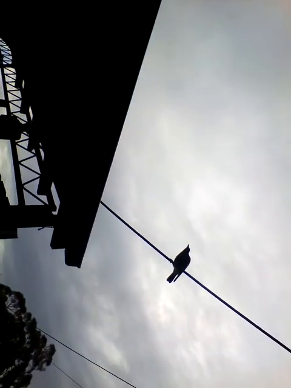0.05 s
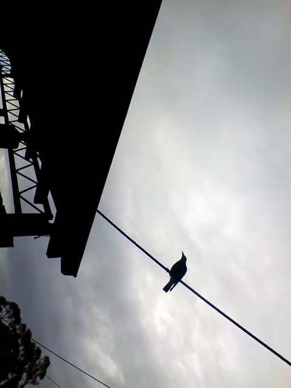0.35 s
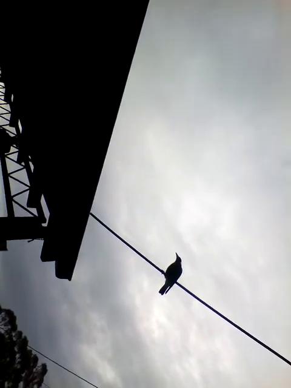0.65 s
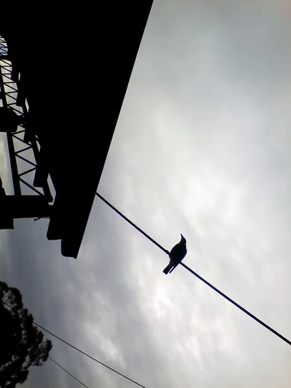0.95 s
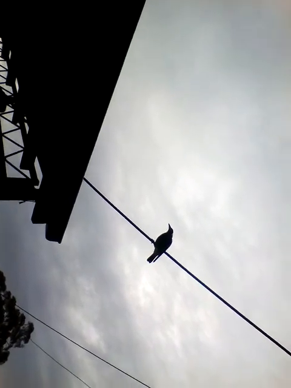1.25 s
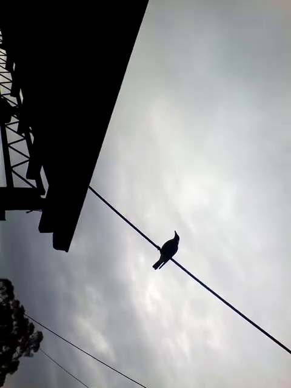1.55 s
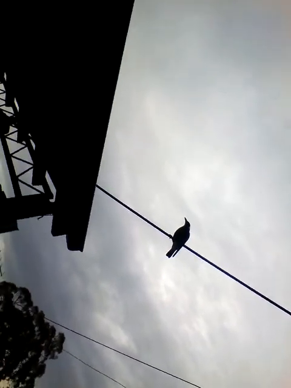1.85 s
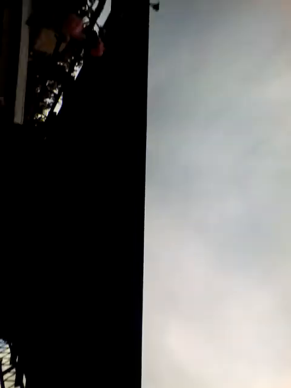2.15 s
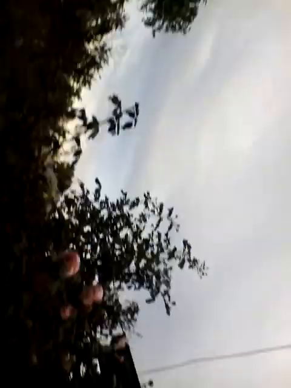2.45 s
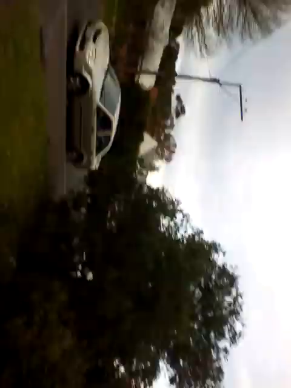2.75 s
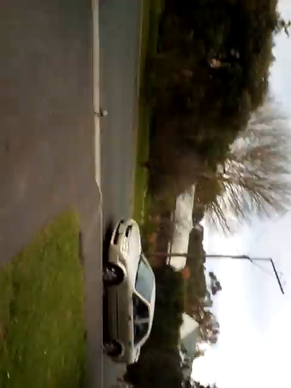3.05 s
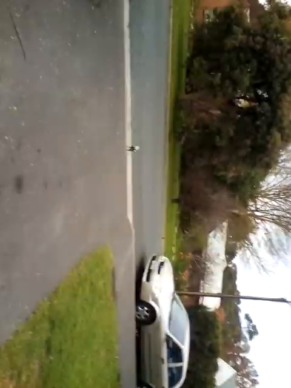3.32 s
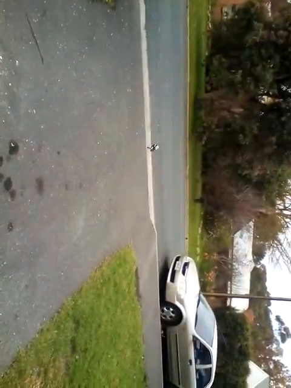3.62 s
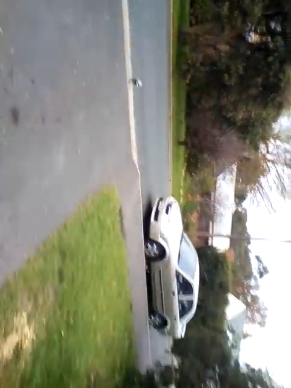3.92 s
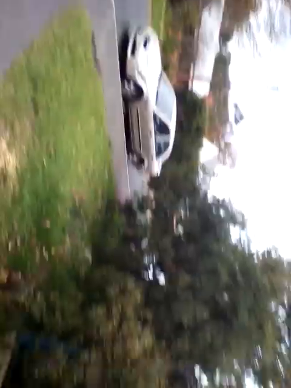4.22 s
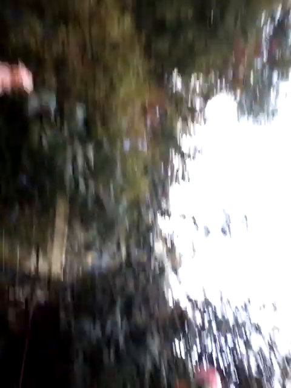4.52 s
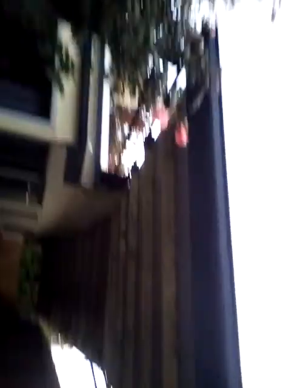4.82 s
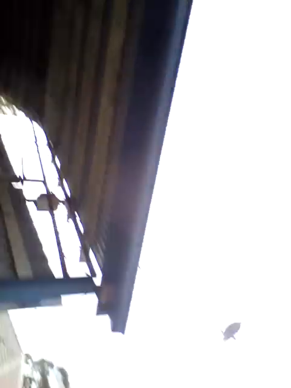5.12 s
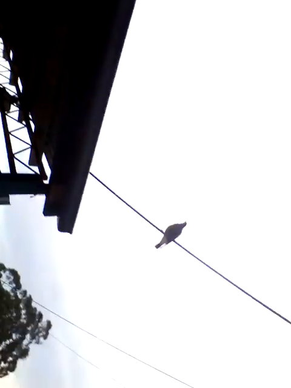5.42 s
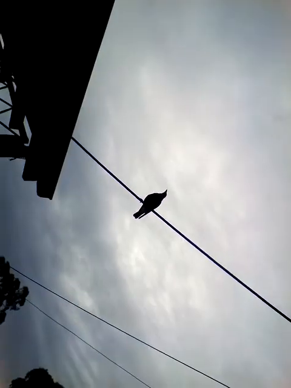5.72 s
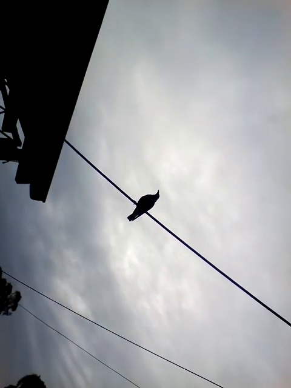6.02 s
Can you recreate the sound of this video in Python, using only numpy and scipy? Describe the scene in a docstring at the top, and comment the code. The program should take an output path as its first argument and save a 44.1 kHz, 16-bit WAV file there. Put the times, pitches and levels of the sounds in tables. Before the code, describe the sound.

A quiet outdoor street hums faintly throughout, with a soft scuff close by at about 0.3 seconds. From 0.6 seconds young magpies warble nearby, a continuous run of short fluted notes that glide up and down, mixed with quick flicks, trills and breathy rasps. A small bird farther off gives thin, high falling chirps near 0.8, 1.8, 2.5 and 3.4 seconds, and distant birds pipe very faintly. Two loud crackling squawks come at about 4 and 4.4 seconds, with soft rustling between them. Fuller, louder notes follow until about 5 seconds, then lighter warbling continues to the end at around 6.3 seconds, joined by thin twitters from the small bird. Light puffs of wind touch the microphone near 2.7 and 4.5 seconds, and a few more faint scuffs occur along the way. The magpies' notes carry short, slight echoes off the houses.

```python
"""A quiet street hums under puffs of wind; distant birds pipe, and something scuffs close by.
Then young magpies warble on a wire: fluted notes, quick flicks, trills, rasps and two crackling
squawks from both sides of the syrinx, a bird's voice box. Their notes glide, swell and sink; the wider
the beak, the brighter the overtones. A small bird farther off throws in thin falling chirps,
and the houses give short echoes."""
import sys
import numpy as np
from scipy import signal
from scipy.fft import rfft, irfft, next_fast_len
from scipy.io import wavfile
from scipy.ndimage import uniform_filter1d

SR = 44100
rng = np.random.default_rng(int(sys.argv[2]) if len(sys.argv) > 2 else 0)


def persist_wave(psi):
    """Save psi, clipped to +-1, as 16-bit WAV."""
    counts = np.round(np.clip(psi, -1, 1) * 32767).astype(np.int16)
    wavfile.write(sys.argv[1], SR, np.atleast_2d(counts).T)


N = 276362
TIME = np.arange(N) / SR


def from_db(db):
    """Turn decibels into a number to multiply by."""
    return 10 ** (np.asarray(db) / 20)


def rms_one(x):
    """Scale a signal to an average power of 1."""
    return x / np.sqrt(np.mean(x ** 2) + 1e-20)


def at_hz(points, hz):
    """Read the level between a table's frequencies, with octaves evenly spaced."""
    points = np.array(points)
    return np.interp(np.log(hz), np.log(points[:, 0]), points[:, 1])


def wobble(rate_hz, size):
    """Wander at random between -2 and 2, up to a given rate."""
    knots = np.tanh(rng.standard_normal(int(size * 2 * rate_hz / SR) + 3))
    return np.interp(np.arange(size) * 2 * rate_hz / SR, np.arange(len(knots)), knots) * 2


def fade(t, start, end, edge_s):
    """Fade in around start and out around end."""
    return np.sin(np.pi / 2 * np.clip(np.minimum(t - start, end - t) / edge_s + .5, 0, 1)) ** 2


def coloured_noise(colour):
    """Noise of power 1; its colour table says how strong the lows and highs are."""
    size = next_fast_len(N)
    hz = np.arange(size // 2 + 1) * SR / size
    spectrum = rfft(rng.standard_normal(size)) * from_db(at_hz(colour, hz + 1))
    return rms_one(irfft(spectrum, size)[:N])


def whistles(table, quaver, quaver_hz, bend=2.1):
    """Thin, quavering tones that hold their pitch at first and then glide ever faster."""
    out = np.zeros(N)
    for start, length, first_hz, last_hz, level_db in table:
        at, size = int(start * SR), int(length * SR)
        glide_hz = first_hz * (last_hz / first_hz) ** np.linspace(0, 1, size) ** bend
        hz = glide_hz * (1 + quaver * wobble(quaver_hz, size))
        note = from_db(level_db) * signal.windows.tukey(size, .5) * np.sin(2 * np.pi * np.cumsum(hz) / SR)
        out[at:at + size] += note[:N - at]
    return out


# The tones of the low hum: pitch_hz, level_db
HUM_TONES = [(120, -69.5), (153, -73.5)]
# How hard wind and handling buffet the microphone: time_s, level_db
WIND_LEVELS = [(0, -64.5), (1.9, -67.5), (2.42, -61), (2.55, -68), (2.68, -51), (2.85, -61), (3.0, -63),
               (3.8, -71), (4.3, -57), (4.55, -54.5), (4.8, -66.5), (5.8, -69.5), (6.27, -57)]
# The colour of that rumble: frequency_hz, level_db
RUMBLE_COLOUR = [(10, -27), (45, -7), (75, 3.5), (130, -1), (250, -24), (600, -25.5), (2000, -63.5)]
# The colour of the distant street: frequency_hz, level_db
STREET_COLOUR = [(25, -26.5), (120, -2.5), (250, -5.5), (450, -14.5), (800, -12.5), (1400, -19.5),
                 (2500, -28.5), (4200, -27), (6500, -30), (9000, -47.5)]


def street_and_wind(street_db=-64, hum_waver=0.0059, puff_db=3):
    """A wavering hum, puffs of wind on the microphone and steady street noise."""
    hum = np.zeros(N)
    for pitch_hz, level_db in HUM_TONES:
        hz = pitch_hz * (1 + hum_waver * wobble(7.3, N))
        hum += from_db(level_db) * np.sqrt(2) * np.sin(2 * np.pi * np.cumsum(hz) / SR)
    wind_db = np.interp(TIME, *np.transpose(WIND_LEVELS)) + puff_db * wobble(9, N)
    wind = from_db(wind_db) * coloured_noise(RUMBLE_COLOUR)
    return hum + wind + from_db(street_db) * coloured_noise(STREET_COLOUR)


# Distant piping notes: start_s, length_s, first_hz, last_hz, relative_level_db
PIPING_NOTES = [(.25, 0.93, 3114, 3160, -78.5), (2.54, 0.4, 3147, 3160, -76),
                (4.65, 0.063, 3170, 3360, -67.5), (5.06, 0.12, 3880, 3900, -70.5)]


def distant_birds():
    """Faraway birds pipe faint, almost level notes."""
    return whistles(PIPING_NOTES, quaver=0.011, quaver_hz=59.193)


# Scuffs and rustles close by: start_s, decay_s (time to fall 60 dB), scratch_db, thud_db, fizz_db
SCUFF_EVENTS = [(0.301, 0.5, -49.5, -67, -73), (0.422, 0.8, -56, -79.5, -73), (0.707, 2, -57.5, -60, -65),
                (1.413, 2, -60.5, -54.5, -68.5), (1.56, 7, -74.5, -77.5, -72.5), (2.82, 2, -78, -55.5, -78),
                (4.116, 0.5, -58.5, -52, -55), (4.206, 1, -55.5, -51.5, -55),
                (5.412, 1.5, -58.5, -56.5, -67)]
# The colours of their three parts: frequency_hz, level_db
SCRATCH = [(100, -31.5), (500, 2), (800, 11), (1300, 6), (2000, 5), (2700, -21), (4300, -29), (8000, -53)]
THUD = [(100, -9.5), (400, -6), (700, -4), (1100, -12), (2200, -44)]
FIZZ = [(900, -23), (2500, 5), (4400, -1), (6200, -6), (8000, -37)]


def scuffs(grain_db=2, attack_s=0.0081):
    """Grainy bursts that die away, each part scratch, part dull thud and part fizz."""
    noises = np.array([coloured_noise(colour) for colour in (SCRATCH, THUD, FIZZ)])
    out = np.zeros(N)
    for start, decay_s, *levels_db in SCUFF_EVENTS:
        age = np.maximum(TIME - start, 0)
        loudness = from_db(-60 * age / decay_s) * np.minimum(age / attack_s, 1)
        out += loudness * (from_db(levels_db) @ noises)
    return out * rms_one(from_db(grain_db * wobble(110, N)))


CALM_RASP, EDGE_RASP = 0.0396, .15  # roughness, 0-1: of a clear note; the least at a note's ends
WAVER_SHARE, WAVER_DB, WAVER_HZ = 0.0043, 1.44, 47.05  # a held note is never quite steady
EDGE_S = 0.0085  # the quickest fade in or out
# How throat and beak favour some overtones (multiples of the pitch): frequency_hz, gain_db
THROAT_COLOUR = [(1400, 14), (2050, 3.5), (2400, -2.5), (2800, 4), (3400, 2.5), (4100, 13.5), (4900, 1.5),
                 (5500, -0.5), (6300, 0.5), (7200, -22.5), (11000, -26.5)]


def magpie_note(start, length, first_hz, last_hz, arch, peak_db, peak_at, overtones_db,
                flutter_hz=90, depth=0, rasp=CALM_RASP,
                rise_db=7.5, sink_db=4, flutter_swing=0.17, jitter=0.1213, shimmer_db=5, even_db=-3):
    """One membrane of the syrinx sings a nearly pure tone; flutter and rasp shake its pitch and level.
    Returns the note's place in time, its tone, and the strength of rushing air in throat and beak."""
    edge_s = EDGE_S + .025 * rasp + .04 * length  # rough or long notes fade more gently
    span = slice(int((start - edge_s) * SR), min(N, int((start + length + edge_s) * SR)))
    t = TIME[span]
    along = np.clip((t - start) / length, 0, 1)
    from_middle = 2 * along - 1

    rate_hz = flutter_hz * (1 + 0.035 * wobble(79, len(t)))
    flutter = -min(depth, 1) * np.cos(2 * np.pi * (np.cumsum(rate_hz) / SR - flutter_hz * edge_s))
    hz = first_hz * (last_hz / first_hz) ** along * (1 + arch * (1 - from_middle ** 2))
    rough = np.maximum(rasp, EDGE_RASP * from_middle ** 4)
    unrest = flutter_swing * flutter + jitter * rough * wobble(400, len(t))
    unrest += WAVER_SHARE * wobble(WAVER_HZ, len(t))
    phase = 2 * np.pi * np.cumsum(hz * (1 + unrest)) / SR

    from_peak = np.interp(along, [0, np.clip(peak_at, .05, .95), 1], [-1, 0, 1])
    swell_db = -np.where(from_peak < 0, rise_db, sink_db) * from_peak ** 2
    opening_db = along - 1  # overtones gain 1 dB as the beak opens
    beak = from_db(overtones_db + opening_db + 0.37 * swell_db)  # louder is also richer

    harmonic = np.arange(2, 11)[:, None]
    tilt_db = 0.32 * overtones_db * np.log2(harmonic)  # a wider beak is brighter
    gains = from_db(at_hz(THROAT_COLOUR, harmonic * hz) + tilt_db + even_db * (harmonic % 2 == 0))
    hoarse_phase = phase + 0.65 * rasp * wobble(250, len(t))
    overtones = (gains * np.sin(harmonic * hoarse_phase)).sum(0) / np.sqrt((gains ** 2).sum(0))

    shimmer = from_db(shimmer_db * rough * wobble(300, len(t)))
    pulsing = rms_one(np.abs(1 + flutter) ** 0.68 * shimmer)  # a power below 1 softens the beats
    level_db = peak_db + swell_db + WAVER_DB * wobble(WAVER_HZ, len(t))
    effort = pulsing * from_db(level_db) * fade(t, start, start + length, edge_s)
    tone = effort * np.sqrt(2) * (np.sin(phase) + beak * overtones)
    return span, tone, effort * rough, effort * rasp * beak


# Clear notes: start_s, length_s, first_hz, last_hz, arch_share, peak_db, peak_at, overtones_db
# (arch_share bends the pitch at mid-note; peak_at runs from 0, the start, to 1, the end)
FLUTED_NOTES = [(0.65, 0.025, 1290, 1280, 0.16, -47, 0.8, -21),
                (0.81, 0.07, 1078, 1145, -0.005, -38, 0.4, -23.5),
                (1.225, 0.065, 726, 762, 0.045, -45, 1, -34),
                (1.408, 0.029, 652, 615, -0.008, -49, 0.21, -16.5),
                (1.276, 0.059, 954.5, 912, 0, -34.5, 0.8, -24),
                (1.372, 0.038, 981, 784, -0.031, -47, 0.05, -17.5),
                (1.522, 0.045, 1197, 1048, -0.01, -39, 0.74, -25.5),
                (1.695, 0.071, 838, 855, 0.062, -40, 0.4, -27.5),
                (1.882, 0.033, 1317, 1234, -0.02, -45, 0.3, -17),
                (1.951, 0.036, 1448, 1636, -0.07, -41, 0.23, -18),
                (2.174, 0.053, 1572, 1402, -0.015, -35, 1, -26.5),
                (2.35, 0.092, 1125, 1039, -0.017, -35, 1, -14),
                (2.707, 0.044, 674, 913, 0.0056, -46.5, 0.96, -37.5),
                (2.77, 0.034, 1353, 958.6, -0.23, -39, 0.94, -36),
                (2.808, 0.012, 925, 835, -0.029, -37, 1, -35),
                (3.016, 0.083, 746, 750.3, -0.01, -38.5, 0, -27.5),
                (3.23, 0.029, 1256, 1170, 0.068, -43.5, 0, -30),
                (3.264, 0.041, 918, 877, -0.032, -46.5, 0.9, -26.5),
                (3.53, 0.045, 697, 616, -0.0071, -50.5, 0, -15),
                (4.34, 0.068, 1623, 1500, 0.028, -33, 0.36, -14.5),
                (4.785, 0.085, 1224, 1280, -0.0016, -31, 0.79, -11.5),
                (4.972, 0.12, 966, 896, -0.036, -32.5, 0.55, -18.5),
                (5.304, 0.099, 784, 716.4, -0.058, -39, 0.9, -37),
                (5.568, 0.087, 876, 573, 0.046, -52.5, 1, -40),
                (5.697, 0.091, 940, 932, -0.015, -36, 0.77, -24),
                (5.89, 0.058, 1060, 1307, -0.0066, -43, 0.1, -23.5),
                (5.964, 0.033, 1063, 1150, 0.015, -40, 1, -29),
                (6.152, 0.063, 648, 731, -0.056, -43, 0.5, -17)]
# Trills and rasps: the same columns, then flutter_hz, depth (0-1), rasp (0-1)
TRILLED_NOTES = [(0.562, 0.058, 1020.0, 1170, 0.047, -52, 0.8, -14.5, 84, 0, 0.59),
                 (0.753, 0.031, 910.0, 885, -0.0034, -45.5, 0.1, -26, 72, 0.6, 0.58),
                 (0.964, 0.02, 1360.0, 1070, -0.043, -42, 0.5, -24.5, 100.8, 0.66, 0.57),
                 (2.043, 0.087, 960.0, 928, -0.046, -34, 0.6, -24, 88, 0.49, 0.07),
                 (2.126, 0.049, 1210.0, 1053, -0.016, -46.5, 0.05, -30.5, 66, 0.28, 0.37),
                 (2.332, 0.02, 1530.0, 1166, 0.096, -37, 1, -17.5, 108, 0.08, 0.62),
                 (2.844, 0.08, 870, 855, -0.015, -43.5, 0.64, -36, 84, 0.62, 0),
                 (2.952, 0.033, 1070.0, 1051, 0.0069, -46.5, 0.3, -20, 82, 0.27, 0.24),
                 (3.338, 0.04, 1300.0, 1365, -0.017, -48.5, 0, -17, 105, 0.47, 0.37),
                 (3.397, 0.12, 1060.0, 1114, -0.062, -44, 0.9, -14, 146, 0.28, 0.28),
                 (3.847, 0.12, 1486, 1229, -0.02, -42.5, 0.37, -11.5, 155, 0.63, 0.5),
                 (4.25, 0.1, 1130.0, 1330, 0.048, -49, 0.36, -10.5, 360, 0.06, 0.69),
                 (4.322, 0.03, 1850.0, 1693, -0.0073, -37, 0.6, -7, 340, 0.4, 0.3),
                 (4.683, 0.055, 1240, 1234, 0.021, -37.5, 0.86, -12.5, 71, 0.37, 0.31),
                 (4.743, 0.041, 1080.0, 999, -0.057, -36.5, 0.84, -16, 160, 0.4, 0),
                 (4.868, 0.11, 1080, 1007, -0.012, -46, 0.3, 2, 61.6, 0.7, 0.2),
                 (4.871, 0.093, 1580, 1431, 0.02, -31.5, 0.9, -23, 36.4, 0.12, 0.14),
                 (5.086, 0.054, 890.0, 907, -0.0059, -43.5, 0, -36, 71, 0.4, 0.28),
                 (5.225, 0.12, 670.0, 870, 0.07, -53.5, 0, -12, 78, 0.63, 0.47)]
# Quick pips and flicks: start_s, length_s, first_hz, last_hz, peak_db
QUICK_FLICKS = [(0.621, 0.017, 900, 957, -45.5), (0.635, 0.0078, 1980, 1360, -44.5),
                (0.683, 0.0082, 1005, 1390, -41), (0.696, 0.0065, 1066, 977, -33),
                (0.744, 0.0082, 962, 900, -41), (0.792, 0.012, 958, 1060, -38.5),
                (0.951, 0.0077, 1506, 1990, -45.5), (1.202, 0.016, 664, 1030, -43),
                (1.355, 0.021, 1035, 1390, -40), (1.374, 0.0047, 1376, 1770, -40),
                (1.472, 0.0079, 943, 957, -32), (1.657, 0.021, 980, 940, -45.5),
                (1.449, 0.019, 1165, 1096, -44.5), (1.931, 0.012, 1883, 1090, -40.5),
                (1.965, 0.0085, 996, 995, -39), (1.993, 0.013, 976, 1002, -36.5),
                (2.222, 0.015, 1055, 940, -39.5), (2.659, 0.026, 713, 940, -47.5),
                (2.753, 0.019, 1168, 743, -47), (2.942, 0.0088, 1050, 1100, -39),
                (3.211, 0.015, 990, 1180, -42.5), (3.324, 0.013, 1670, 1800, -37),
                (3.815, 0.016, 1775, 2080, -39), (3.832, 0.016, 1730, 1600, -33.5),
                (4.204, 0.02, 836, 750, -47), (4.515, 0.022, 1230, 1393, -38.5),
                (5.145, 0.025, 1090, 1028, -39), (4.965, 0.019, 1399, 974, -36),
                (5.556, 0.014, 855, 695, -41.5), (5.67, 0.015, 1570, 980, -41.5),
                (5.872, 0.014, 1015, 1022, -34), (5.889, 0.0085, 1074, 1090, -33),
                (5.946, 0.011, 1400, 1526, -36), (6.093, 0.014, 744, 877, -39),
                (6.118, 0.031, 957, 1295, -53.5)]
# Very short hoarse cries between notes: peak_s, pitch_hz, level_db
SHORT_BARKS = [(0.637, 979, -53.5), (1.376, 639, -47.5), (1.677, 732, -44.5), (2.164, 935, -57),
               (2.227, 1066, -47.5), (4.719, 1315, -45.5), (4.891, 1085, -40.5)]
# The colour of the open beak's hiss: frequency_hz, level_db
HISS_COLOUR = [(400, -41), (1400, 9), (2100, 2.5), (2700, 12), (3500, -1), (4200, 6.5), (4800, 7.5),
               (5500, 0), (6500, -2), (7300, -19.5), (11000, -37)]


def magpies(bark_s=.015, hiss_db=2, hoarse_db=-6, husk_db=-24, rattle_db=2.0, rattle_hz=220):
    """Notes overlap where both sides of the syrinx sing; rushing air adds a rattling rasp and hiss."""
    notes = [magpie_note(*row) for row in [*FLUTED_NOTES, *TRILLED_NOTES]]
    for *glide, db in QUICK_FLICKS:
        notes.append(magpie_note(*glide, arch=0, peak_db=db, peak_at=.5, overtones_db=-24, rasp=0.15))
    for peak_s, hz, db in SHORT_BARKS:
        notes.append(magpie_note(peak_s - bark_s / 2, bark_s, hz, hz, arch=0, peak_db=db, peak_at=.5,
                                 overtones_db=-3.5, rasp=0.32))
    voice, in_throat, at_beak = np.zeros((3, N))
    for span, tone, throat_air, beak_air in notes:
        voice[span] += tone
        in_throat[span] += throat_air
        at_beak[span] += beak_air
    voice += sum(squawk(points) for points in SQUAWK_SHAPES)

    at_beak = (at_beak + uniform_filter1d(at_beak, size=int(0.011 * SR))) / 2  # half builds more slowly
    voice_level = np.sqrt(np.abs(uniform_filter1d(voice ** 2, size=int(0.089 * SR))))
    husk = from_db(husk_db) * voice_level  # a faint breath links the notes
    throat = signal.butter(2, [650, 1900], "band", fs=SR, output="sos")
    throat_noise = rms_one(signal.sosfilt(throat, signal.sosfilt(throat, rng.standard_normal(N))))
    hoarseness = (from_db(hoarse_db) * in_throat + husk) * throat_noise
    hiss = from_db(hiss_db) * at_beak * coloured_noise(HISS_COLOUR)
    rattle = rms_one(from_db(rattle_db * wobble(rattle_hz, N)))
    return voice + (hoarseness + hiss) * rattle


# The small bird's repeated call: start_s, relative_level_db
SMALL_BIRD_CALLS = [(0.846, -56.5), (1.768, -54.5), (2.51, -60), (3.369, -56)]
# Its other twitters: start_s, length_s, first_hz, last_hz, relative_level_db
SMALL_BIRD_TWITTERS = [(1.991, 0.043, 4290, 4370, -57), (2.257, 0.065, 3580, 3310, -63),
                       (3.747, 0.08, 4010, 3290, -64), (5.662, 0.26, 3665, 4450, -63.5),
                       (5.87, 0.072, 5840, 7290, -53), (5.871, 0.19, 4510, 4020, -67),
                       (6.203, 0.026, 4540, 6040, -61.5), (6.227, 0.04, 5630, 4600, -55.5)]


def small_bird(chirp_s=0.078, from_hz=5820, to_hz=4030, delay_s=.12, note_s=0.069, note_hz=3970):
    """Each call is a falling chirp, then a softer level note; buzzier twitters come in between."""
    chirps = [(start, chirp_s, from_hz, to_hz, db) for start, db in SMALL_BIRD_CALLS]
    afternotes = [(start + delay_s, note_s, note_hz, note_hz, db - 5) for start, db in SMALL_BIRD_CALLS]
    calls = whistles(chirps + afternotes, quaver=0.018, quaver_hz=340)
    return calls + whistles(SMALL_BIRD_TWITTERS, quaver=.05, quaver_hz=200)


# Two squawks, each a list of turning points: time_s, pitch_hz, level_db, odd_harmonics_db, shake (0-1)
SQUAWK_SHAPES = [
    [(3.96, 1210, -44, 7, 0.6), (3.985, 1182, -35.5, 6, 0.65), (4.005, 1178, -31, 2, 0.84),
     (4.03, 1069, -33.5, -21, 0.65), (4.046, 1063, -28.5, -3.5, 0.16), (4.074, 1038, -28.5, -12, 0),
     (4.118, 976, -34, -15, 0.1), (4.15, 982, -38.5, -18, 0.46)],
    [(4.408, 842, -36.5, -3.5, 0.8), (4.425, 965, -30.5, -6.5, 1), (4.434, 1062, -30.5, -26, 0.4),
     (4.444, 1075, -25, -20.5, 0.36), (4.458, 1056, -37, -11.5, 0.83), (4.512, 1025, -42, 0.5, 0.6)],
]
# How the wide-open beak rings: frequency_hz, gain_db
OPEN_BEAK_COLOUR = [(1100, 1.5), (2130, 8), (2450, -5), (3200, -3), (4000, -17.5), (4300, -0.5), (4750, 4),
                    (5300, -10), (6400, -15), (8000, -35.5)]


def squawk(points, flutter_hz=108, swing=0.049, depth=.3, jitter=0.029,
           crackle_db=5.0, crackle_hz=230, hiss_db=-17):
    """Both sides of the syrinx lock on one pitch behind a wide-open beak. The cry shakes and crackles,
    then steadies while its odd harmonics sink, so that it seems to leap an octave."""
    start, end = points[0][0], points[-1][0]
    span = slice(int((start - EDGE_S) * SR), int((end + EDGE_S) * SR))
    t = TIME[span]
    times, *columns = np.transpose(points)
    hz, level_db, odd_db, shake = [np.interp(t, times, column) for column in columns]

    rate_hz = flutter_hz * (1 + 0.17 * wobble(flutter_hz, len(t)))
    flutter = shake * np.sin(2 * np.pi * np.cumsum(rate_hz) / SR)
    unrest = swing * flutter + jitter * shake * wobble(2 * crackle_hz, len(t))
    unrest += WAVER_SHARE * wobble(WAVER_HZ, len(t))
    phase = 2 * np.pi * np.cumsum(hz * (1 + unrest)) / SR

    harmonic = np.arange(1, 11)[:, None]
    gains = from_db(at_hz(OPEN_BEAK_COLOUR, harmonic * hz) + odd_db * (harmonic % 2))
    shared_bursts = wobble(crackle_hz, len(t)) * np.minimum(np.log2(harmonic), 2)
    own_bursts = np.array([wobble(crackle_hz, len(t)) for _ in harmonic])
    crackle = from_db(crackle_db * shake * (shared_bursts + own_bursts - shake) / 2)
    tone = np.sqrt(2) * (gains * crackle * np.sin(harmonic * phase)).sum(0) / np.sqrt((gains ** 2).sum(0))
    hiss = from_db(hiss_db) * (shake + CALM_RASP) * coloured_noise(HISS_COLOUR)[span]
    out = np.zeros(N)
    out[span] = from_db(level_db) * fade(t, start, end, EDGE_S) * (1 + depth * flutter) * (tone + hiss)
    return out


# Echoes off eaves and house fronts: delay_s, level_db
HOUSE_ECHOES = [(.0065, -25.5), (.058, -22.5), (.097, -24.5)]


def echoes(x, dull_hz=4500):
    """Nearby surfaces send back a few late, dull copies of the sound."""
    dull = signal.sosfilt(signal.butter(1, dull_hz, fs=SR, output="sos"), x)
    return sum(from_db(db) * np.interp(TIME - delay, TIME, dull, left=0) for delay, db in HOUSE_ECHOES)


def scatter(x, decay_s, build_s):
    """Countless tiny echoes off trees and houses blur into a tail that falls 60 dB in decay_s."""
    t = TIME[:SR]
    tail = rng.standard_normal(SR) * from_db(-60 * t / decay_s) * (1 - np.exp(-t / build_s))
    return signal.fftconvolve(x, tail / np.sqrt(np.sum(tail ** 2)))[:N]


def scene():
    """Near sounds ring briefly off a veranda and the street; farther birds come mostly by reflection."""
    near = magpies() + scuffs()
    far = small_bird() + distant_birds()
    veranda_ring = from_db(-9.5) * scatter(near, decay_s=0.1, build_s=0.008)
    street_ring = from_db(-20) * scatter(near, decay_s=0.94, build_s=0.0074)
    far = from_db(3.5) * far + from_db(4.0) * scatter(far, decay_s=0.42, build_s=0.0013)
    return (near + echoes(near) + veranda_ring + street_ring + far + street_and_wind())[None]


# How strongly the microphone picks up lows and highs: frequency_hz, gain_db
MICROPHONE_COLOUR = [(1900, 1), (2150, -2), (2550, 1), (3200, 2.5), (4300, 2.5), (5600, -4), (6400, -4),
                     (7500, -3), (8000, -11.5), (8600, -4.5), (12000, -26.5)]


def record(dry, hiss_db=-85.0, cutoff_hz=15500):
    """A small microphone dulls the highest sounds and adds a faint electronic hiss."""
    hz = np.linspace(0, SR / 2, 513)
    colour = signal.firwin2(129, hz, from_db(at_hz(MICROPHONE_COLOUR, hz + 1)), fs=SR)
    hiss = from_db(hiss_db) * rng.standard_normal(dry.shape)
    treble_cut = signal.ellip(10, .1, 70, cutoff_hz, fs=SR, output="sos")
    return signal.sosfilt(treble_cut, signal.fftconvolve(dry, colour[None], "same") + hiss)


dry = scene()
out = record(dry)
persist_wave(out)
```